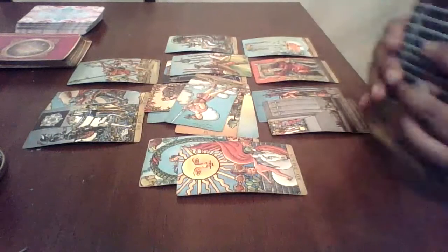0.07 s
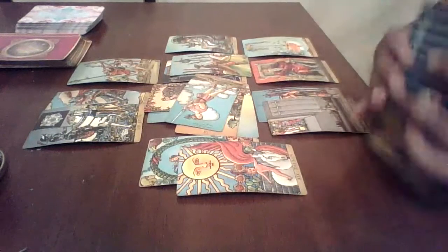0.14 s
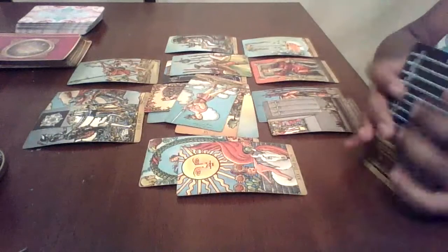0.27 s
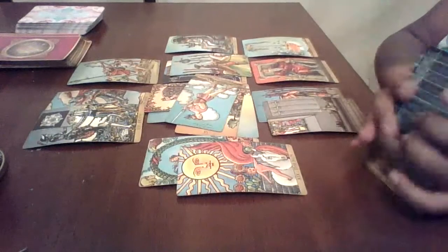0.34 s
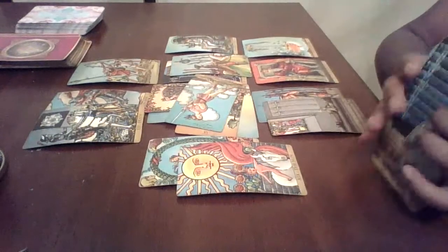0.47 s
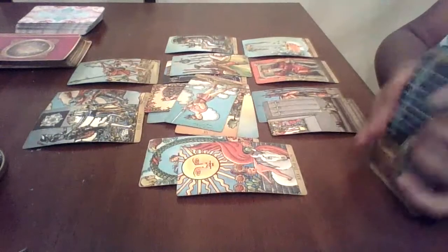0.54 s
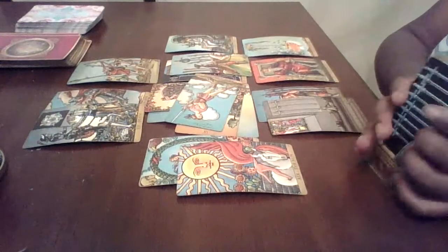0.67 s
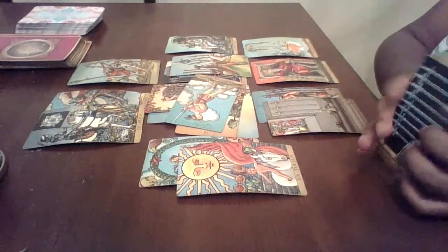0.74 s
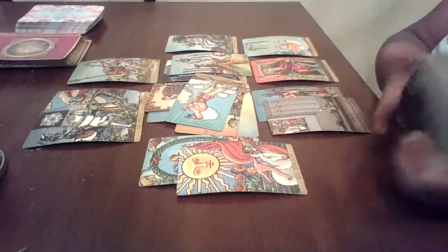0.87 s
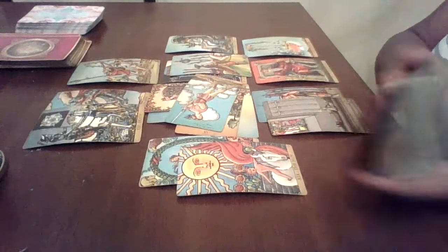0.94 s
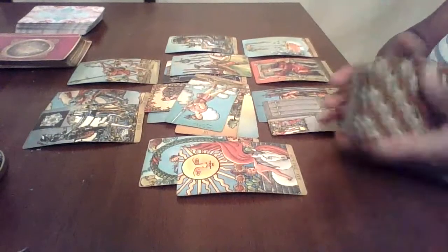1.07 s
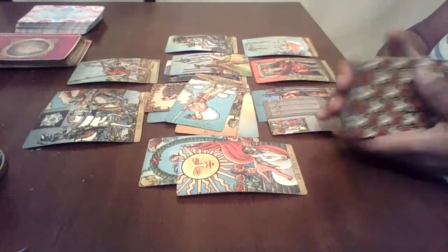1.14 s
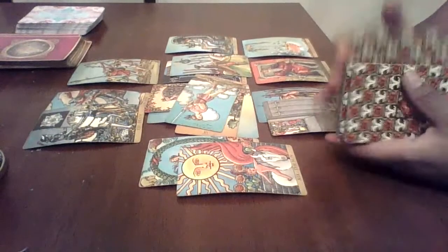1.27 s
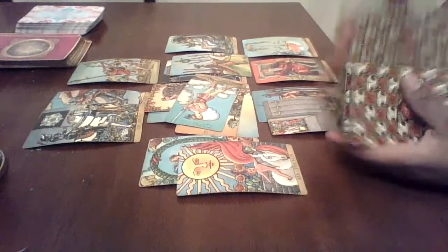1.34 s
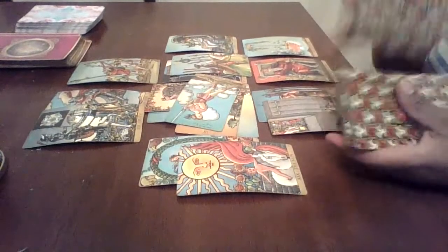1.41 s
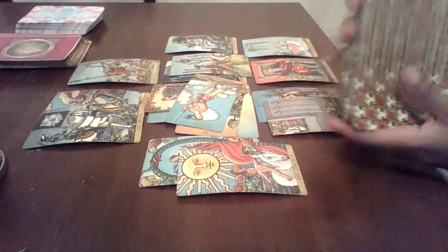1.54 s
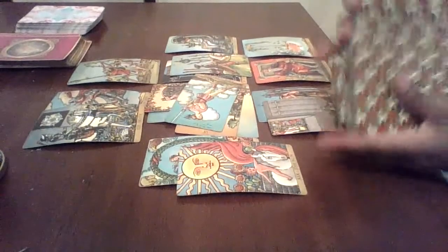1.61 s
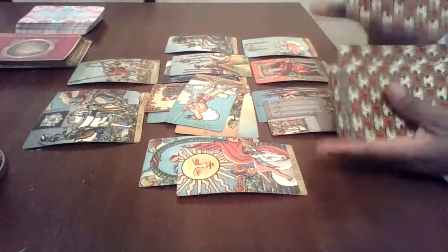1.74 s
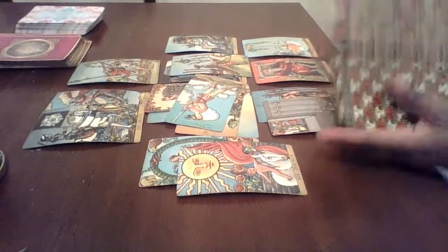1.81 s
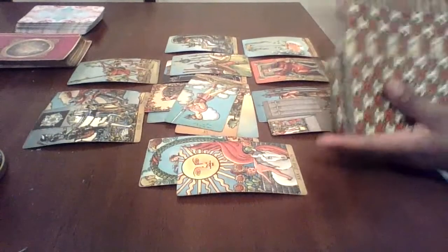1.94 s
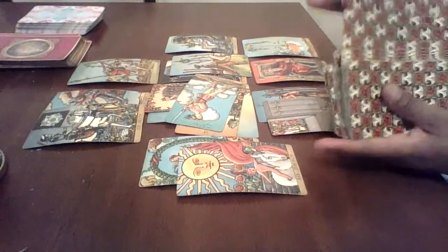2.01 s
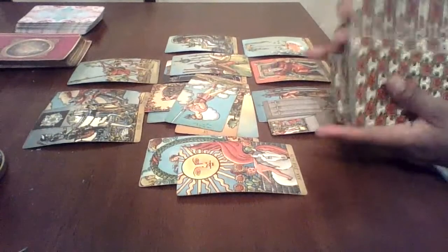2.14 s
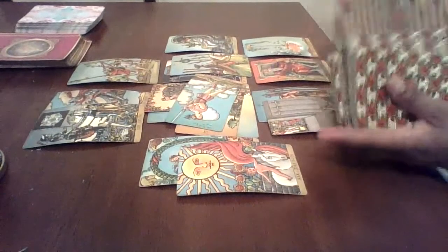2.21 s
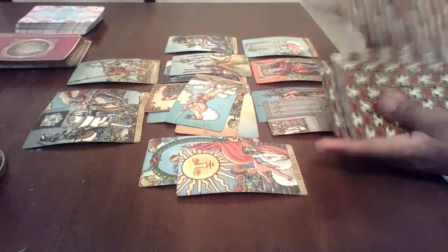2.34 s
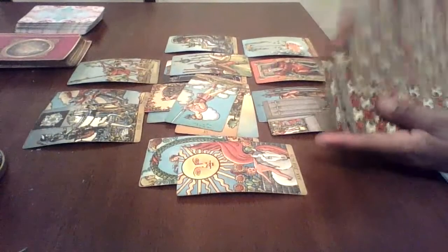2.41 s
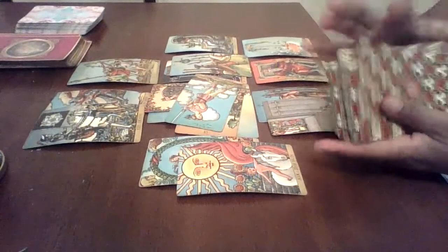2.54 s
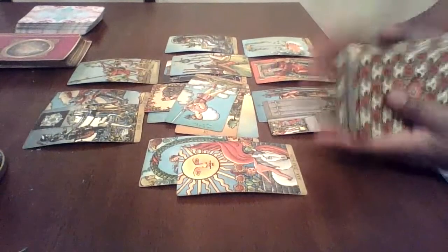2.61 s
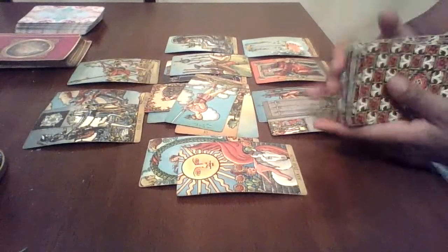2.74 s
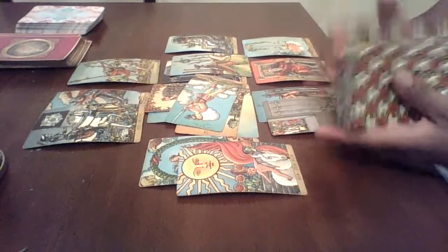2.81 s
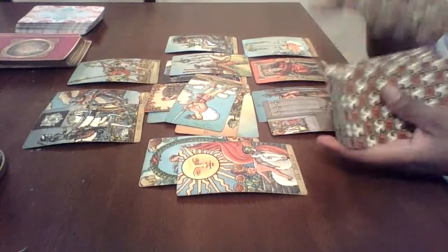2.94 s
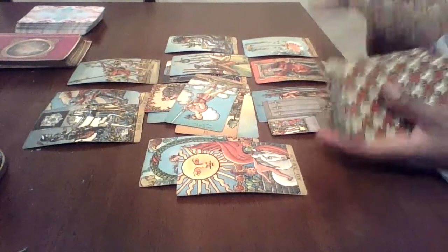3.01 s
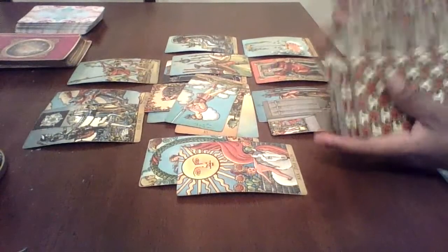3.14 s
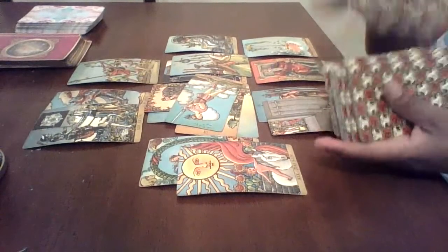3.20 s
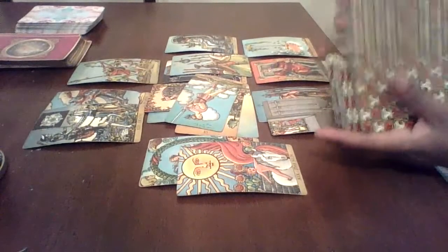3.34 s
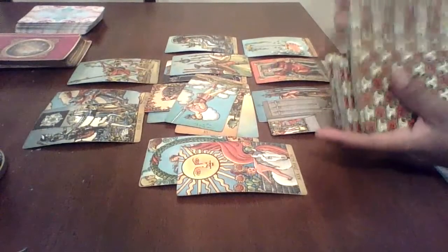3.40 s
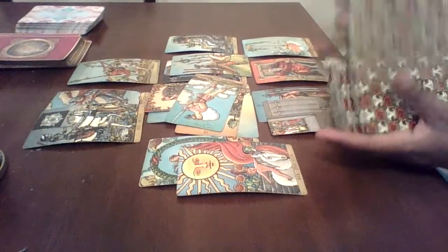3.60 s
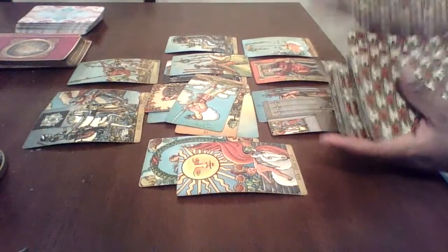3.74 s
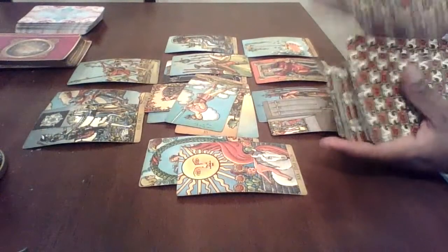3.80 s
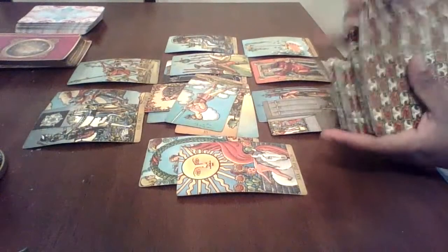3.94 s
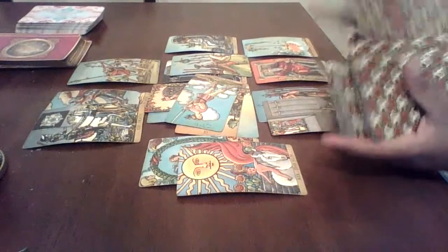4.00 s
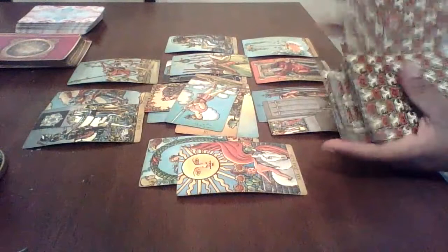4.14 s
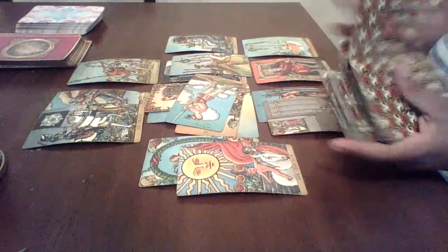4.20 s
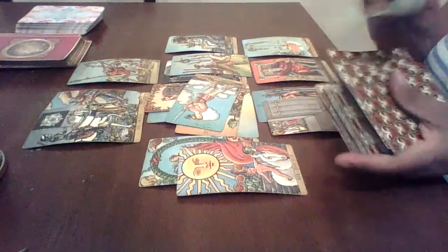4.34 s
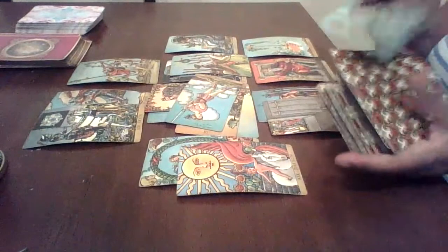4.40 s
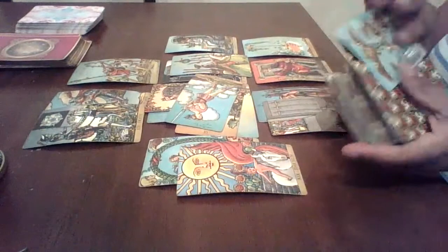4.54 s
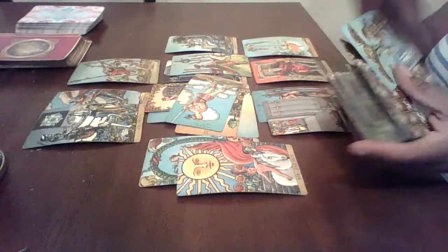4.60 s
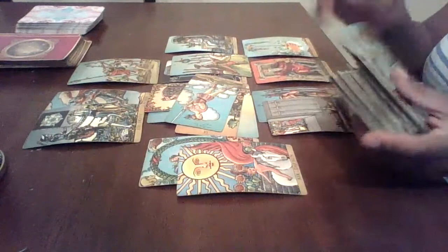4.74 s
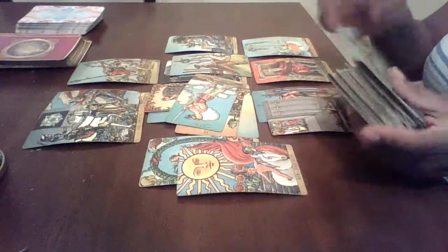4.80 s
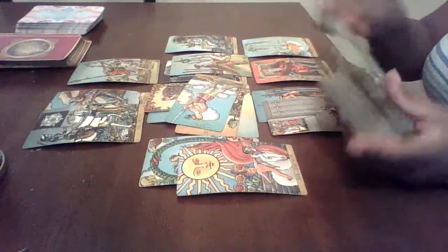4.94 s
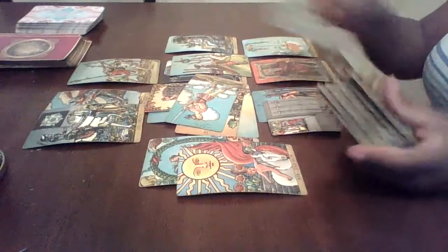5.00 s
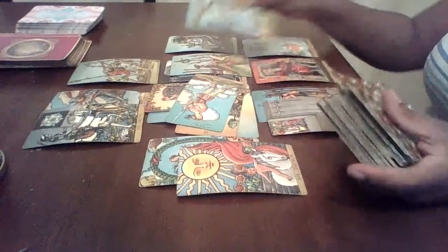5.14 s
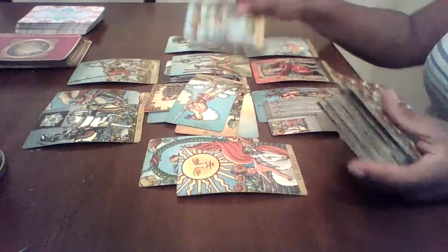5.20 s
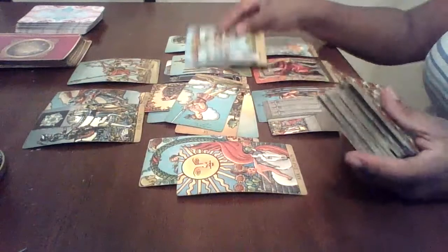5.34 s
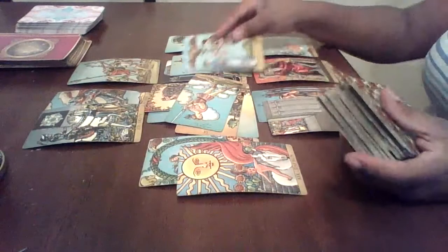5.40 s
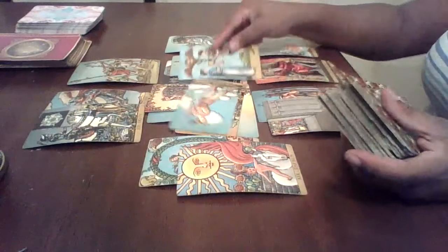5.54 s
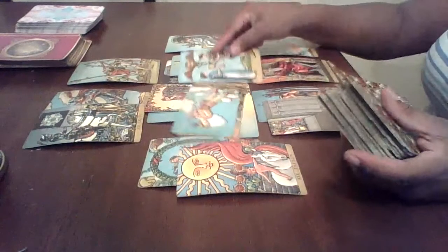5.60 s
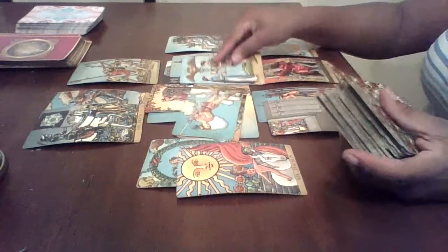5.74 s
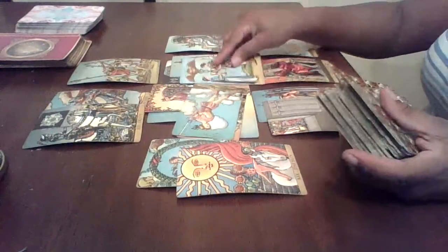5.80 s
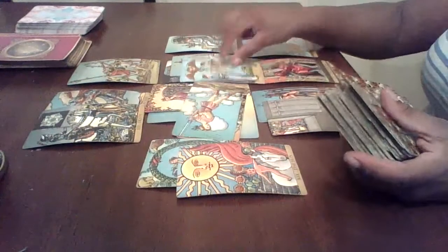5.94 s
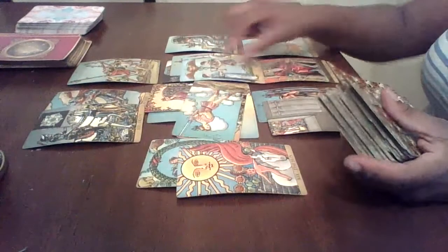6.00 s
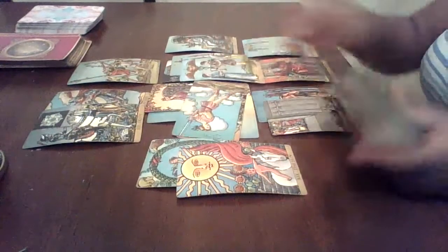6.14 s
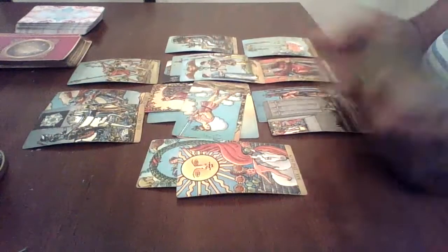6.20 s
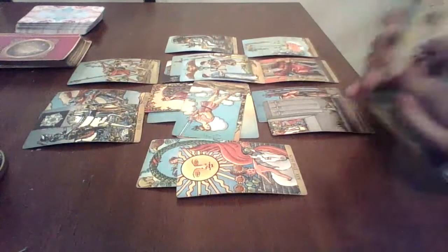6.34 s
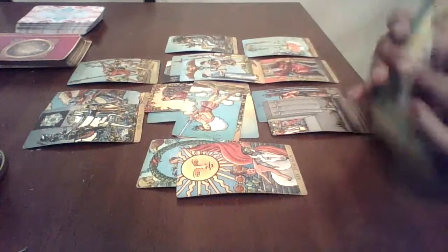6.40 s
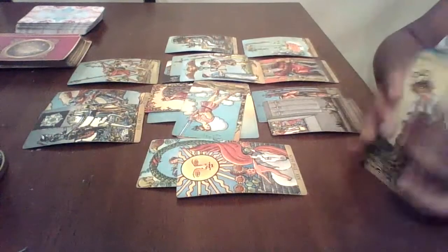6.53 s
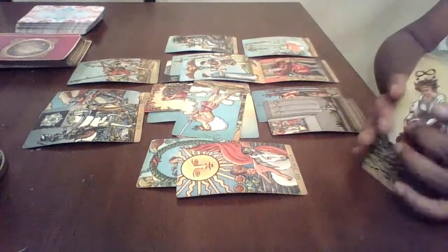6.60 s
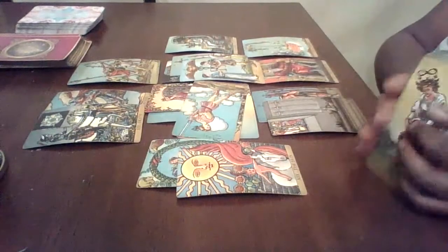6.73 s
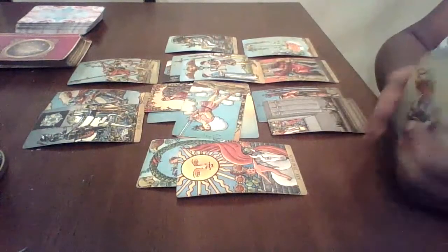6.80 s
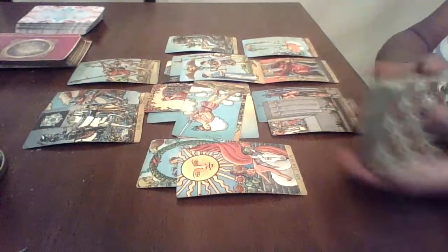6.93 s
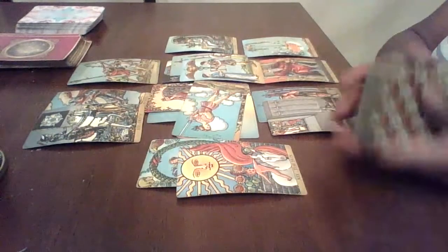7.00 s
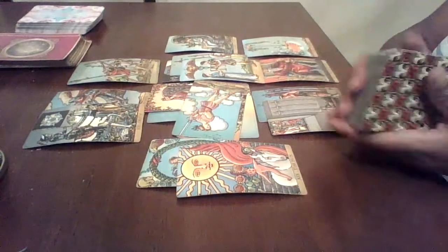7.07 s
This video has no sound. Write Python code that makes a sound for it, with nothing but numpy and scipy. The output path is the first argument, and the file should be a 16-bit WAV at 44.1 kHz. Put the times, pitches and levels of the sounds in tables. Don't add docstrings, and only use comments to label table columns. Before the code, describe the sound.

Close card handling over a low fan hum: boomy deck slaps, a light overhand shuffle, one sharp card snap, a final heavy thump on wood.

```python
import sys
import numpy as np
from scipy import signal
from scipy.fft import rfft, irfft, next_fast_len
from scipy.io import wavfile
from scipy.ndimage import uniform_filter1d

SR = 44100
rng = np.random.default_rng(int(sys.argv[2]) if len(sys.argv) > 2 else 0)


def gain_from_db(level_db):
    decades = np.asarray(level_db, float) / 20
    return 10 ** decades


def output_pcm(signal):
    pcm = np.clip(np.atleast_2d(signal).T, -1, 1) * 32767
    wavfile.write(sys.argv[1], SR, np.round(pcm).astype(np.int16))


N = 315312


def rms_one(x):
    return x / np.sqrt(np.mean(x ** 2) + 1e-20)


def peak_one(x):
    return x / np.max(np.abs(x), axis=-1, keepdims=True)


def at_hz(points, hz):
    table_hz, values = np.transpose(points)
    return np.interp(np.log(hz + 1), np.log(table_hz), values)


def band(x, low_hz, high_hz):
    edges = [low_hz, min(high_hz, .45 * SR)]
    return signal.sosfilt(signal.butter(2, edges, "band", fs=SR, output="sos"), x)


def resonance(x, hz, width_hz):
    r = np.exp(-np.pi * width_hz / SR)
    top = np.array([1, 0, -1]) * (1 - r * r) / 2
    return signal.lfilter(top, [1, -2 * r * np.cos(2 * np.pi * hz / SR), r * r], x)


def modes(x, rows):
    out = 0
    for k, (hz, width_hz, db) in enumerate(rows):
        out = out + (-1) ** k * gain_from_db(db) * resonance(x + 1e-18, hz, width_hz)
    return out


def dips(x, rows):
    for hz, width_hz, depth in rows:
        x = x - np.clip(depth, 0, 1) * resonance(x + 1e-18, hz, width_hz)
    return x


def drift(rate_hz):
    r = np.exp(-2 * np.pi * rate_hz / SR)
    wander = signal.lfilter([1], [1, -2 * r, r * r], rng.standard_normal(N + SR))
    return rms_one(wander[SR:])


def add(track, piece, s):
    at = round(s * SR)
    track[at:at + len(piece)] += piece[:N - at]


# (frequency [Hz], width [Hz], level [dB])
FAN_HUM = [(35.13, 7.8, -51.5), (90.8, 19, -57), (117.1, 11, -63.5), (147.5, 13.6, -54), (180.2, 2.4, -66),
           (232.5, 5.4, -63), (296.6, 17, -64), (403.5, 49, -64), (733, 78, -70), (1503, 34, -80)]
# (frequency [Hz], density [dB per Hz])
FAN_AIR = [(12, -35), (20, -0.5), (40, -11.5), (60, -18), (150, -9), (172, -10), (241, -18), (262, -20.5),
           (293, -11), (328, -19), (399, -16.5), (825, -29), (1480, -34), (4420, -50), (16000, -46.5)]


def background():
    size = next_fast_len(N)
    hz = np.arange(size // 2 + 1) * SR / size
    spectrum = rfft(rng.standard_normal(size)) * gain_from_db(at_hz(FAN_AIR, hz))
    sound = gain_from_db(-50.5) * rms_one(irfft(spectrum, size)[:N])
    for f, width_hz, db in FAN_HUM:
        white = rng.standard_normal(N + SR)
        hum = resonance(resonance(white, f, width_hz), f, width_hz)
        sound = sound + gain_from_db(db) * rms_one(hum[SR:])
    return sound


# (frequency [Hz], level [dB])
MOTOR_LINES = [(119.8, -58.5), (149.2, -51), (298, -67)]


def motor():
    t = np.arange(N) / SR
    wander, sway = np.cumsum(drift(2.8)) / SR, drift(1.7)
    sound = 0
    for hz, db in MOTOR_LINES:
        sound = sound + gain_from_db(db + 4.1 * sway) * np.sin(2 * np.pi * hz * (t + 0.004 * wander))
    return sound


# (frequency [Hz], t60 [s])
ROOM_DECAY = [(200, 0.29), (700, 0.65), (2000, 0.71), (4000, 0.52), (8000, 0.35), (15000, 0.38)]
# (frequency [Hz], level [dB])
TAIL_COLOUR = [(150, 2.5), (700, -13.5), (1500, -14.5), (3000, -12.5), (6000, -13), (15000, -25)]
# (frequency [Hz], width [Hz], depth [0-1])
TAIL_DIPS = [(535, 90, .7), (722, 30, .6), (1491, 30, .5), (3200, 900, .25)]


def room(x):
    t, tail = np.arange(SR) / SR, 0
    edges = 120 * 2 ** np.arange(0, 7.6, .5)
    white = rng.standard_normal((2, SR))
    for k, (low, high) in enumerate(zip(edges, edges[1:])):
        hz = np.sqrt(low * high)
        level_db = at_hz(TAIL_COLOUR, hz) - 60 * t / at_hz(ROOM_DECAY, hz)
        tail = tail + band(white[k % 2], low, high) * gain_from_db(level_db)
    onset = np.clip(t / 0.0055, 0, 1)
    early = 1 + 0.5 * gain_from_db(-60 * t / 0.23)
    tail *= onset * gain_from_db(-26.5) * early
    return signal.fftconvolve(x, dips(tail, TAIL_DIPS))[:N]


# (time [s], boom [dB], dullness [dB per octave], push [dB])
LANDINGS = [(0.247, -21, 10, -23), (0.258, -22.5, 8.5, -22.5), (0.575, -16, 12, -17.5),
            (0.611, -15, 7, -26), (4.098, -32.5, 13, -57), (4.141, -31, 22, -40), (4.169, -40, 7, -36),
            (5.907, -34, 2.5, -30.5), (6.503, -12.5, 2, -23), (6.517, -22.5, 3.5, -22),
            (6.544, -15.5, 4.5, -18)]
# (frequency [Hz], level [dB], t60 [s])
TABLE_MODES = [(43.6, -11.5, 0.14), (64.8, -3.5, 0.38), (66.5, -20.5, 0.18), (112.3, -6, 0.29),
               (119.3, -5, 0.42), (198, -14, 0.71), (240, -19, 0.12), (297, -7, 0.5), (333, -0.5, 0.37),
               (376.5, 0.5, 0.14), (461, -37.5, 0.24), (534, -17, 0.15)]
# (time [s], level [dB])
AIR_PUFFS = [
    (1.852, -44),
    (2.429, -42),
    (3.084, -44),
    (5.9042, -27),
    (0.2365, -29),
]


def table():
    booms, pushes, t = np.zeros(N), np.zeros(N), np.arange(SR * 3 // 4) / SR
    luck = rng.standard_normal((len(LANDINGS), 2, len(TABLE_MODES)))
    for (s, boom_db, dull_db, push_db), (strength, phase) in zip(LANDINGS, luck):
        add(pushes, -gain_from_db(push_db) * signal.windows.hann(round(0.0014 * SR)), s)
        for (hz, level_db, t60), k, p in zip(TABLE_MODES, strength, phase):
            swell = 1 - np.exp(-t * hz / 0.39)
            mode = swell * gain_from_db(-60 * t / t60) * np.sin(2 * np.pi * hz * t + 2 * p)
            mode_db = boom_db + level_db - dull_db * np.log2(hz / 100) + 2 * k - 12.5
            add(booms, gain_from_db(mode_db) * mode, s)
    for s, push_db in AIR_PUFFS:
        add(pushes, -gain_from_db(push_db) * signal.windows.hann(round(0.0017 * SR)), s)
    return booms, band(pushes, 123, 710)


# (frequency [Hz], width [Hz], level [dB])
TOP_MODES = [(695, 11, -5), (743, 18, -3.5), (805, 19, 1), (1116, 9.5, 0), (1202, 17, 0.5), (1290, 14, -2),
             (1590, 14, -4), (1920, 14, -1.5), (2027, 15, -1.5), (2430, 16, 1), (2530, 20, 4),
             (2820, 15.8, -6), (3150, 22, -8), (3620, 20, -8)]


def table_top(sent):
    return modes(sent, TOP_MODES)


# (time [s], hiss [dB])
FINGERS = [(0, -77), (0.8, -80), (1.3, -69.5), (1.5, -85), (2.25, -71), (2.7, -73.5), (3.0, -91),
           (4.8, -84), (5.6, -76), (6.1, -91), (6.45, -70.5), (7.15, -76)]
# (time [s], hold [s], fade [s per 20 dB], hiss [dB], rub [dB])
PACKET_SKIDS = [(0.266, .02, 0.12, -62, -70), (0.592, .005, 0.2, -62.5, -66), (1, .005, 0.4, -72, -70),
                (1.078, 0.03, -0.5, -70, -81), (1.552, .003, 0.12, -54, -51),
                (1.614, 0.075, 0.06, -58.5, -72), (1.852, 0.037, 0.13, -59, -63),
                (1.891, .007, 0.03, -52, -66), (1.93, .07, 0.1, -66, -71), (2.073, .11, .02, -61, -67),
                (2.429, 0.049, 0.1, -55, -63.5), (2.662, .003, .06, -65, -74),
                (3.096, .003, 0.02, -52, -73), (3.132, .003, .07, -52, -71.5),
                (3.355, 0.03, 0.13, -59.5, -58), (3.412, .003, 0.1, -53.5, -56),
                (3.635, .003, 0.12, -52.5, -60.5), (3.92, 0.046, 0.18, -56.5, -58.5),
                (4.147, 0.092, 0.14, -57.5, -61), (4.266, .012, 0.06, -52.5, -72),
                (4.322, 0.18, 0.09, -64.5, -70), (5.926, .003, 0.15, -45, -41),
                (6.19, 0.087, 0.2, -64, -65.5), (6.53, 0.053, 0.23, -55, -47.5)]
# (time of the top [s], rise [s per 20 dB], fade [s per 20 dB], hiss [dB], rub [dB])
CARD_DRAWS = [(0.136, -0.3, 0.2, -63, -80), (0.22, -0.2, 0.16, -63, -80), (0.55, 0.3, 0.4, -74, -64),
              (0.865, .12, 0.14, -61, -73), (0.915, 0.2, 0.03, -57.5, -80), (0.945, 1, -0.1, -59, -80),
              (1.382, .08, .035, -54.5, -69), (2.93, 0.3, 0.05, -58.5, -74),
              (3.716, 0.02, .035, -49.5, -58), (3.96, 0.1, 0.09, -54, -72), (5.896, 0, .012, -56.5, -63),
              (6.044, 0.4, 0.24, -67, -56), (6.81, -0.1, 0.17, -62, -100), (6.862, 0.2, .05, -63, -110),
              (6.92, 1.5, .06, -66, -95)]
# (time [s], hiss [dB])
FINGER_BRUSHES = [(0.004, -61), (0.208, -63), (0.375, -63), (0.742, -62), (3.864, -65), (4.098, -54),
                  (4.569, -62), (4.653, -62), (4.85, -66), (4.874, -67), (4.948, -66), (5.006, -72),
                  (5.06, -67.5), (5.492, -69.5), (5.8, -70.5), (6.388, -61), (0.975, -74)]


def strokes():
    t = np.arange(N) / SR
    restless, base = 1.7 * drift(14), np.interp(t, *np.transpose(FINGERS))
    power = gain_from_db(2 * np.array([base + restless, base + 2 + restless, -75.5 + 0.4 * restless]))
    # time, rise, hold, fade, hiss, rub, then the top of the hiss against its middle [dB]
    rows = [(s, 0.01, *rest, -1) for s, *rest in PACKET_SKIDS]
    rows += [(s, rise, 0, *rest, -1) for s, rise, *rest in CARD_DRAWS]
    rows += [(s, .015, 0, 0.025, db, db - 5, 1) for s, db in FINGER_BRUSHES]
    for s, rise, hold, fade, hiss_db, rub_db, air_db in rows:
        start = max(round((s - 2 * rise) * SR), 0)
        span = slice(start, round((s + hold + 2 * fade) * SR))
        before, after = (s - t[span]) / rise, (t[span] - s - hold) / fade
        loss_db = 20 * np.maximum(np.maximum(before, after), 0)
        top_db = hiss_db + air_db + 0.25 * (hiss_db - rub_db - 7.0)
        power[:, span] += gain_from_db(2 * (np.array([[hiss_db], [top_db], [rub_db]]) - loss_db))
    return np.sqrt(power)


def slide():
    levels = strokes()
    sizes = gain_from_db(3.2 * np.minimum(rng.exponential(1, (2, N)), 6))
    grains = rng.standard_normal((3, N)) * sizes[[0, 0, 1]]
    flutter, sway = 1.4 * drift(80), drift(32)
    hiss = rms_one(band(grains[0], 4400, 10300)) * gain_from_db(-4.0 + flutter)
    air_db = -2.0 + 0.4 * flutter + 0.5 * flutter[::-1]
    air = rms_one(band(grains[1], 10600, 18400)) * gain_from_db(air_db)
    rub = rms_one(band(grains[2], 1470, 6000)) * gain_from_db(-1.5 + 2.0 * sway)
    hiss = hiss + resonance(hiss, 7500, 1000) * gain_from_db(1.5 + 5 * sway[::-1] - 6)
    return np.sum(uniform_filter1d(levels, size=200) * [hiss, air, rub], axis=0)


# (time [s], peak [dB], lower edge [Hz])
FLAT_CRACK = (5.9076, -2.5, 3000)
# (time [s], frequency [Hz], level [dB])
CORNER_TWANGS = [
    (0.7688, 5500, -50),
    (0.7768, 7000, -47),
    (2.9385, 8500, -41),
    (1.556, 7560, -48),
    (4.018, 3800, -50),
    (6.861, 14000, -47),
    (0.578, 7000, -48),
    (0.579, 2800, -46),
]


def twangs():
    out, t = np.zeros(N), np.arange(SR // 30) / SR
    s, peak_db, low_hz = FLAT_CRACK
    add(out, -gain_from_db(peak_db) * peak_one(band(1. * (t == 0), low_hz, 16500)), s)
    for s, hz, db in CORNER_TWANGS:
        decay = gain_from_db(db - 60 * t / .014)
        add(out, decay * np.sin(2 * np.pi * hz * t) * np.clip(t / .0008, 0, 1), s)
    return out


def colour(rows, tick_db):
    s, face, hollow, edge, sharp = np.transpose(rows)
    tick = edge + 0.47 * sharp + tick_db
    return np.transpose([s, edge, face + hollow, face, tick, edge + sharp])


# (from [Hz], to [Hz], rattle t60 [s], polarity)
CONTACT_VOICES = [
    (2360, 3910, 0.0089, 0.77),
    (549, 870, 0.018, 0.81),
    (1100, 2036, 0.044, -0.78),
    (4380, 8500, 0.019, -1.19),
    (8650, 25000, 0.012, 0.96),
]


def contacts(rows, stretch, click_share, room_db):
    t = np.arange(SR // 12) / SR
    times, levels = np.array(rows)[:, 0], gain_from_db(np.array(rows)[:, 1:] + 3.5)
    rattles, sounds, clicks = rng.standard_normal((len(rows), len(t))), 0, 0
    for (low_hz, high_hz, t60, polarity), level in zip(CONTACT_VOICES, levels.T):
        click = peak_one(band(1. * (t == 0), low_hz, high_hz))
        chatter = peak_one(band(rattles * gain_from_db(-60 * t / (stretch * t60)), low_hz, high_hz))
        sound = polarity * level[:, None] * (0.69 * chatter - click_share * click)
        sounds = sounds + sound
        strength = np.linalg.norm(sound, axis=1, keepdims=True) / np.linalg.norm(click)
        clicks = clicks + polarity * click * strength
    direct, sent = np.zeros((2, N))
    for s, sound, click in zip(times, sounds, clicks):
        add(direct, sound, s)
        add(sent, gain_from_db(room_db) * click, s)
    return np.array([direct, sent])


# (time [s], face [dB], edge [dB], sharpness [dB])
CORNER_TICKS = [(1.3922, -57, -47.5, -11), (1.722, -63, -50.5, -18), (1.901, -60, -49, -7),
                (2.1192, -49, -53, -3), (2.3136, -57, -56, 0.5), (2.4644, -59.5, -48, -2.5),
                (2.9224, -51, -66, 14), (3.1314, -45, -44, 0), (3.951, -49, -44, -2),
                (4.0212, -61, -45, -12.5), (4.0913, -69, -49.5, -11.5), (4.218, -62, -57, 12),
                (4.5625, -64, -57, -4), (4.6499, -68.5, -63, -11), (4.9454, -52.5, -60.5, -4.5),
                (5.004, -62, -68, 2.5), (6.274, -58, -51, -6), (6.383, -58, -65, 3.5),
                (6.638, -70, -72, 36), (6.652, -70, -70, 36), (6.664, -70, -70, 36)]
# (time [s], face [dB], edge [dB], sharpness [dB])
NAIL_TICKS = [
    (0.769, -68, -72, 0.5),
    (0.7775, -66, -68, 4),
    (1.6284, -53, -53, 1),
    (2.9382, -54, -58, 10),
    (3.6995, -56, -60, 0.5),
]


def edge_ticks():
    corners = [(s, face, -4, edge, sharp) for s, face, edge, sharp in CORNER_TICKS]
    nails = [(s, face, -4, edge, sharp) for s, face, edge, sharp in NAIL_TICKS]
    ticks = contacts(colour(corners, tick_db=5.5), stretch=1.0, click_share=1.0, room_db=-3.0)
    return ticks + contacts(colour(nails, tick_db=14), stretch=0.71, click_share=1.0, room_db=-11.0)


# (time [s], face [dB], hollowness [dB], edge [dB], sharpness [dB])
DECK_SLAPS = [(0.2254, -32.5, 6, -44, 2), (0.2319, -27, -0.5, -30.5, -2), (0.2361, -24.5, -6, -22.5, -21),
              (0.2434, -25.5, -4, -33, 1), (0.2484, -28, -10, -34, -9), (0.2574, -19, -26, -19, -12),
              (0.2613, -25.5, -12, -18, -43), (0.5593, -40.5, 7, -43, -12), (0.5771, -33.5, 9, -29, -14),
              (0.6566, -44, 1.5, -52.5, -15.5), (6.5008, -27.5, 8.5, -21.5, -17),
              (6.5046, -17, -5, -11, -7), (6.5106, -22.5, 6.5, -31.5, -13.5),
              (6.5173, -15.5, -6.5, -18.5, -12), (6.5214, -16.5, -11, -39, -13)]
# (frequency [Hz], width [Hz], depth [0-1])
DECK_BOUNCE = [(962, 180, .6), (2750, 120, 0.17), (4620, 1000, 0.16)]


def squared_deck():
    deck = contacts(colour(DECK_SLAPS, tick_db=-5.5), stretch=1.4, click_share=0.39, room_db=4.5)
    deck = dips(deck, DECK_BOUNCE)
    deck[1] = signal.sosfilt(signal.butter(2, 5500, fs=SR, output="sos"), deck[1])
    return deck


# (time [s], face [dB], hollowness [dB], edge [dB], sharpness [dB])
CARD_SNAP = [
    (5.9050, -33, -7, -29, -15),
    (5.9079, -27, -17, -30, 2.5),
    (5.9135, -50, -6, -47, 3),
]
# (frequency [Hz], width [Hz], level [dB])
SINGLE_CARD_MODES = [(700, 130, -0.5), (1570, 210, 2), (2700, 380, 4), (3740, 230, 2), (4300, 450, 1),
                     (5540, 360, 3), (7200, 1400, -1.5), (9500, 2200, 1), (12500, 3500, 0)]
# (frequency [Hz], width [Hz], depth [0-1])
SNAP_BOUNCE = [(900, 200, .7), (2140, 320, .9)]


def snapped_card():
    card = contacts(colour(CARD_SNAP, tick_db=2.0), stretch=0.55, click_share=3.5, room_db=-4)
    card[0] = dips(1.25 * modes(card[0], SINGLE_CARD_MODES), SNAP_BOUNCE)
    return card


# (time [s], clap [Hz], ring [Hz], buzz [Hz], tick [Hz])
PACKET_PITCHES = [(0, 704, 1625, 2785, 4300), (1.5, 720, 1770, 2700, 4340), (1.8, 650, 1830, 2770, 4300),
                  (2.0, 700, 1625, 2785, 4300), (2.4, 695, 1770, 2785, 4300), (3.0, 720, 1630, 2530, 2900),
                  (3.3, 640, 1610, 2770, 3700), (3.6, 750, 1630, 3200, 3900), (3.8, 700, 1625, 2820, 4300),
                  (4.24, 736, 1500, 2870, 4330), (4.26, 700, 1130, 2870, 4330),
                  (4.4, 704, 1620, 2785, 4300)]
# (width [Hz], level [dB])
PACKET_MODES = [
    (90, -4.5),
    (200, 2),
    (300, 1.5),
    (450, -1.5),
]
# (frequency [Hz], width [Hz], level [dB])
HIGHEST_MODE = (7200, 1050, -11)


def bend(x):
    out = 0.34 * x + modes(x, [HIGHEST_MODE])
    lifted = np.array(PACKET_PITCHES)[:, 0]
    held = np.searchsorted(lifted, np.arange(N) / SR, side="right") - 1
    for k, (_, *pitches) in enumerate(PACKET_PITCHES):
        for hz, (width_hz, db) in zip(pitches, PACKET_MODES):
            out += gain_from_db(db) * resonance(x * (held == k) + 1e-18, hz, width_hz)
    return out


# (time [s], face [dB], hollowness [dB], edge [dB], sharpness [dB])
PACKET_DROPS = [(1.5555, -37, -4, -39.5, 7), (1.615, -50.5, -8, -39.5, 5), (1.6387, -42.5, -4, -50, -13),
                (1.8502, -41, 3.5, -45, 1), (1.8617, -52, -7, -33.5, -7), (1.8926, -43, -9.5, -34.5, -3),
                (2.0617, -52, 12, -49.5, -0.5), (2.0844, -54, -6, -53, 18), (2.4289, -44.5, 6.5, -39, -5),
                (2.5002, -58.5, 5, -46.5, -3), (3.0834, -22.5, -9.5, -18.5, -10),
                (3.3672, -33, -19, -31, -4), (3.4101, -50, 2.5, -48, -9), (3.6376, -32.5, -17, -27, -14),
                (3.915, -54, 14, -38, 0), (4.0128, -57, 14, -44, -8), (4.143, -42.5, -18, -64, 3),
                (4.2625, -42, 6, -37, -7), (4.2824, -45, 9, -33, 6), (4.3014, -43.5, 7.5, -48, -4),
                (4.4644, -62, 13, -56, 8), (4.8733, -59, 10, -53, 12), (6.8573, -64, 15, -53, 12)]
# (time [s], face [dB], hollowness [dB],
# edge [dB], sharpness [dB])
FORE_TOUCHES = [
    (3.0787, -43.5, -15, -55, 11),
    (3.361, -40, -12, -41, -9),
    (3.632, -40, -11.5, -39, -3.5),
    (4.2527, -40.5, 6.5, -37, 15),
    (4.2555, -34, 12, -16, -16),
]


def shuffled_packets():
    cards = contacts(colour(PACKET_DROPS, tick_db=-6.5), stretch=1.53, click_share=0.75, room_db=-3)
    cards += contacts(colour(FORE_TOUCHES, tick_db=-2.0), stretch=1.0, click_share=0.95, room_db=-4.5)
    cards += edge_ticks()
    cards[0] = bend(cards[0])
    return cards


def scene():
    cards, sent = squared_deck() + shuffled_packets() + snapped_card()
    booms, pushes = table()
    hands = cards + twangs() + slide()
    wood = booms + pushes + table_top(sent)
    return (hands + wood + room(sent + pushes) + motor() + background())[None]


def top_cut(x):
    return signal.sosfilt(signal.butter(12, 17340, fs=SR, output="sos"), x)


def record(dry):
    x = signal.sosfilt(signal.cheby2(8, 50, 17250, fs=SR, output="sos"), dry)
    size = next_fast_len(N)
    above = np.arange(size // 2 + 1) * SR / size > 15900
    top = irfft(rfft(x, size) * above, size)[:, :N]
    top_db = 10 * np.log10(np.abs(uniform_filter1d(top ** 2, size=400)) + 1e-20)
    gate = uniform_filter1d(np.clip((top_db + 64) / 4, 0, 1), size=200)
    mix = x - (1 - gate) * top
    return top_cut(mix)


dry = scene()
out = record(dry)
output_pcm(out)
```